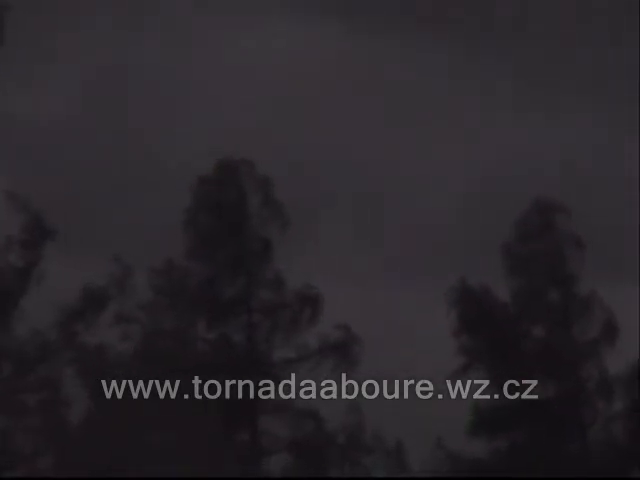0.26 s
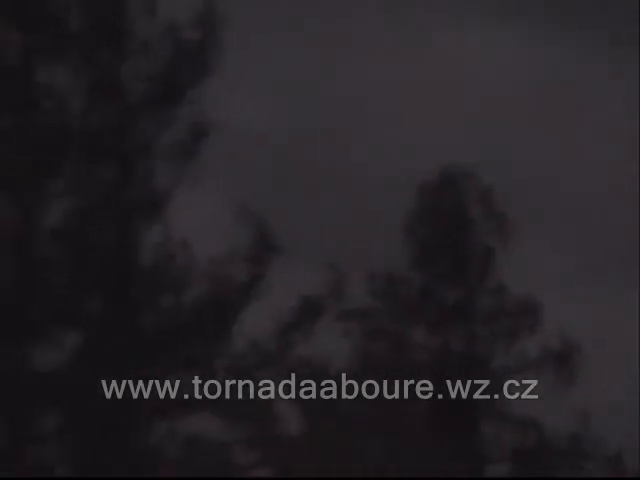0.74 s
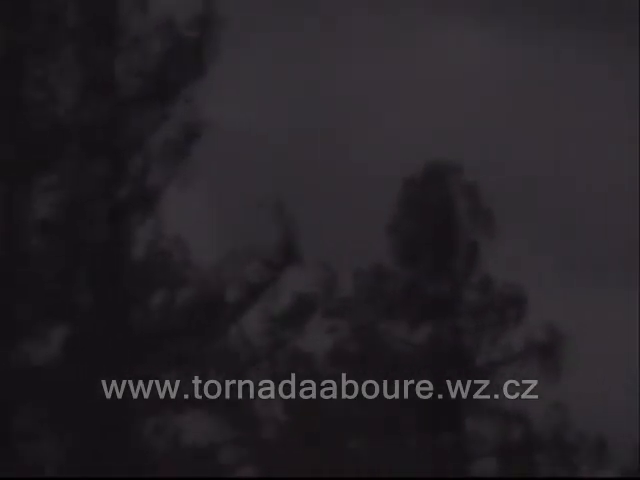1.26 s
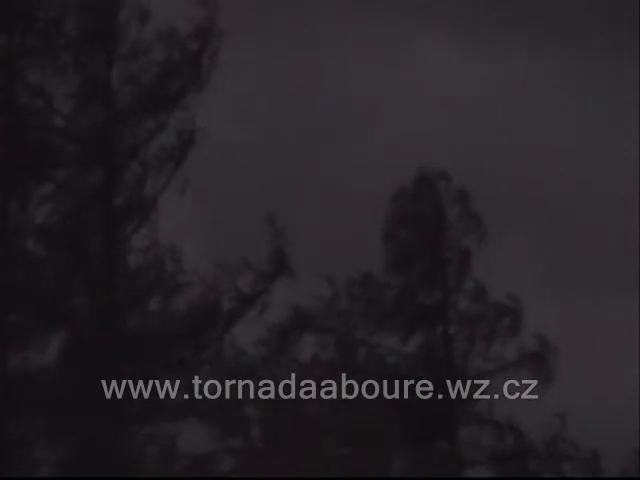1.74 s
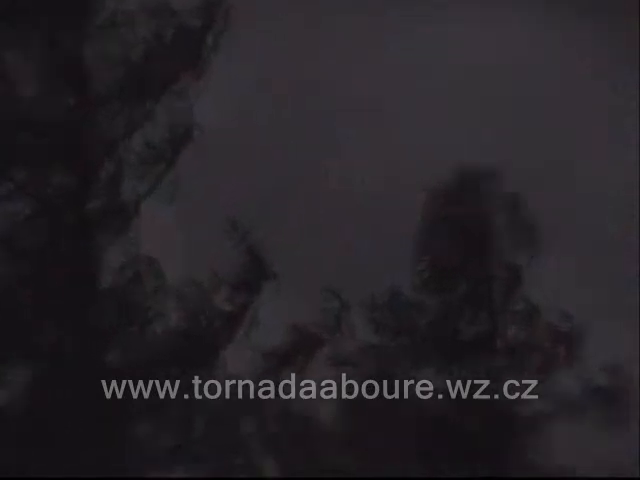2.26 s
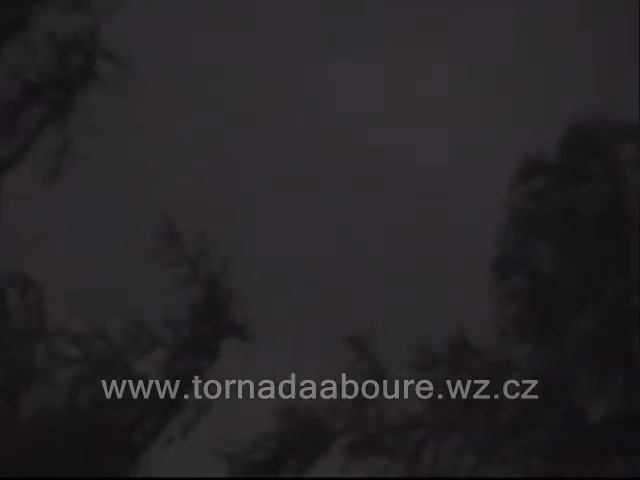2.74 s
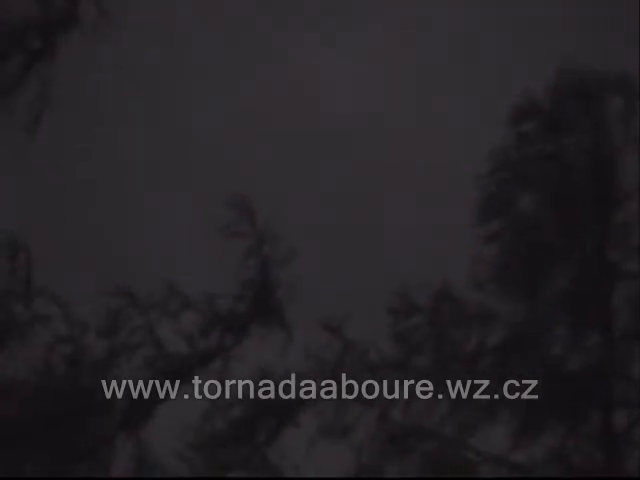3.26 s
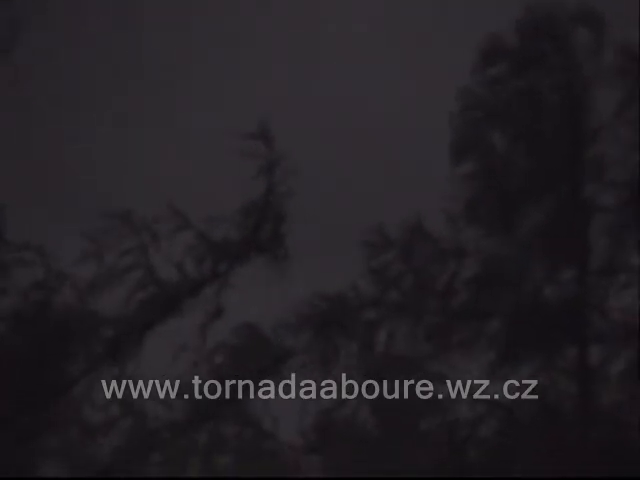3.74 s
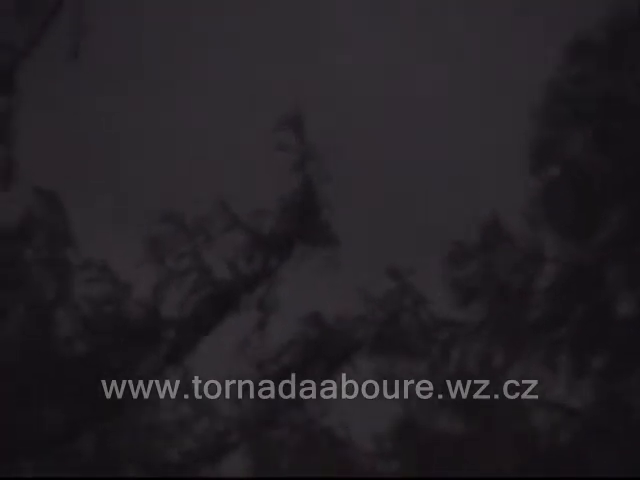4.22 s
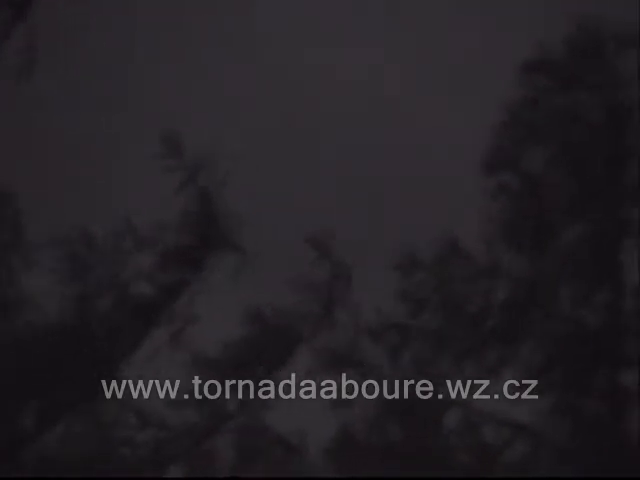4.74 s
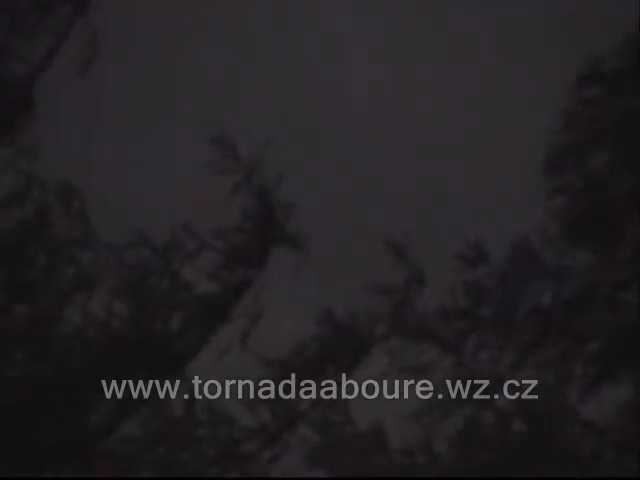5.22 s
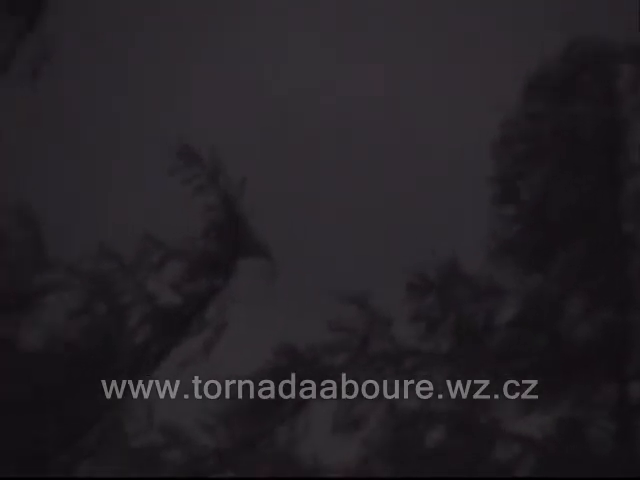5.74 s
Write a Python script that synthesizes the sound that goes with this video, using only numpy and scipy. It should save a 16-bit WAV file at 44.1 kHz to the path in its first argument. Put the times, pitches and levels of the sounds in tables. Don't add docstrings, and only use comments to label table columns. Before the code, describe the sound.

A storm wind blows through conifers close to a small handheld stereo recorder. A smooth, dense, mid-heavy hiss with a soft roar beneath runs throughout, varying only slightly, a little quieter around 3.5-4.5 s; the top end is dull and cut off. Low gusts buffet the bare microphone, pushing left and right in opposite directions. Small bumps come at 0.1 and 0.4 s, then a fluttering cluster of thumps from 0.8 to 1.2 s. Softer rumble follows to 1.9 s, and a hard, overloaded blow lands at 2.2 s. Lighter puffs at 2.5 and 2.9 s lead into a relative lull until about 3.8 s. Heavy buffeting returns from 3.9 to 4.5 s, eases to a low rumble, then grows strongest from 5.2 s to the end, with crowded deep thumps clipping near 5.4 and 5.8 s. A very faint, steady, thin high motor whine stays behind.

```python
import sys
import numpy as np
from scipy import signal
from scipy.fft import rfft, irfft, next_fast_len
from scipy.io import wavfile
from scipy.ndimage import uniform_filter1d

SR = 44100
rng = np.random.default_rng(int(sys.argv[2]) if len(sys.argv) > 2 else 0)


def master(y):
    cut = np.clip(np.atleast_2d(y).T, -1, 1)
    pcm = np.round(cut * 32767)
    wavfile.write(sys.argv[1], SR, pcm.astype(np.int16))


def level_to_linear(level):
    exponent = np.asarray(level, float) / 20
    return 10 ** exponent


N = 264159

# (time [s], level [dB])
WIND_HISS = [(0, -28.5), (.5, -29.5), (1.7, -28.5), (2.1, -29), (2.5, -28.5), (3.0, -30), (3.7, -31),
             (4.45, -31.4), (4.8, -29), (5.05, -30.4), (5.3, -29.5), (5.99, -29.2)]
# (frequency [Hz], density [dB per Hz])
NEEDLE_COLOUR = [(60, -15), (130, -8), (250, -7), (420, -4.5), (560, -2.5), (720, 0.3), (950, -2.5),
                 (1250, -6.5), (1700, -8), (2650, -9.5), (3300, -11.5), (4300, -15), (6000, -19.5),
                 (7400, -23.5)]
# (frequency [Hz], share of the difference tied to the sum [0-1],
# its phase [rad], difference over sum [dB])
PORT_PAIR = [(300, 0.55, -0.7, -13.0), (450, 0.63, -0.8, -13.4), (700, 0.39, -1.5, -14.5),
             (1000, 0.35, -2.0, -10.8), (1400, 0.16, -2.8, -7.7), (2000, 0.12, -2.7, -6.7),
             (2400, 0.26, -3.9, -8.0), (2800, 0.19, -4.1, -6.5), (3300, 0.34, -4.1, -7.4),
             (4000, 0.47, -4.9, -6.7), (5000, 0.43, -5.5, -6.9), (6500, 0.34, -6.1, -6.9),
             (7500, 0.25, -6.6, -7.4), (8100, 0.04, -3.6, -11.7)]
# (start [s], hold [s], opposed level [dB], common level [dB], centre [Hz])
PORT_GUSTS = [(0, .11, -38, -46.5, 90), (0.115, .03, -29, -35, 110), (.40, 0.077, -29, -40.5, 65),
              (.68, 0.073, -38.5, -57, 70), (0.81, 0.083, -20.5, -24, 120), (0.963, .25, -22.5, -32.5, 100),
              (1.247, .15, -34, -46, 60), (1.576, 0.04, -29, -39.5, 62), (1.674, 0.22, -26.5, -38, 82),
              (2.05, 0.069, -33, -40.5, 50), (2.138, 0.067, -22.5, -28.5, 80),
              (2.29, 0.25, -40.5, -52.5, 85), (2.546, .05, -25.5, -34, 88), (2.62, 0.065, -34.5, -43, 80),
              (2.887, 0.064, -26, -37, 65), (3.236, 0.069, -42.5, -45.5, 65), (3.574, 0.11, -40, -40.5, 58),
              (3.78, 0.13, -29, -39.5, 55), (3.941, .29, -20, -28.5, 96), (4.298, .28, -26.5, -35.5, 65),
              (4.722, 0.53, -30.5, -37.5, 52), (5.224, 0.23, -18, -27, 81.4),
              (5.55, .285, -17.5, -27.5, 69), (5.94, .04, -24, -34, 88)]
# (time [s], opposed peak [dB], swing [Hz], common peak [dB])
STRONG_EDDIES = [(.132, -17, 107, -26), (0.414, -11.5, 107, -18.5), (.831, -8.5, 105.5, -18.5),
                 (.856, -9, 115.5, -13.5), (.879, -10.5, 148, -8), (0.916, -10, 117, -31),
                 (.974, -14.5, 84.8, -22), (1.066, -11, 81, -17.5), (1.106, -13, 101, -16),
                 (1.143, -13.5, 89.5, -22), (1.202, -10.5, 108.4, -34), (2.153, -13.5, 70.1, -25.5),
                 (2.191, -9.5, 74.7, -22), (2.208, 0.5, 97.6, -15), (2.919, -13, 66, -25.5),
                 (4.031, -9.5, 68.4, -22), (4.128, -10, 62, -24.5), (4.261, -5.5, 82.6, -21),
                 (4.503, -6, 66.5, -26), (5.293, -9.5, 66, -23), (5.373, -2, 76.3, -21),
                 (5.443, -4.5, 72.5, -20.5), (5.571, -4, 72, -29), (5.691, -7.5, 55, -25),
                 (5.726, -9.5, 108.4, -16), (5.747, -6, 88, -14), (5.783, -0.5, 90, -14),
                 (5.816, 2.2, 82, -17.5), (5.831, -7, 120, -23.5), (5.892, -7.5, 95, -21)]
# (frequency [Hz], left level [dB], right level [dB])
MOTOR_TONES = [(2617.8, -55, -64), (2623.7, -51, -62), (2677, -59, -56), (2682.3, -58, -54),
               (2698.2, -52, -48)]
# (frequency [Hz], gain [dB])
PASS_BAND = [(8, -24), (30, 0), (7400, 0), (7600, -2), (7800, -6), (8000, -15), (8150, -25), (8400, -70)]

SPLIT_HZ = 1566
ROAR_DB, ROAR_FOLLOWS = -27.5, 0.45
RISE_DB_PER_S, FALL_DB_PER_S = 500.5, 261.5
LULL_DB, LULL_COMMON_DB, LULL_HZ = -48, -58, 62
FLOW_UNDER_DB = 3.5
EDDY_MS = 8.2
FLICK_HZ, FLICK_MS, FLICK_SCATTER_S = 255, 7.3, 0.0057
FLICK_LOSS_DB, FLICK_COMMON_LOSS_DB, FLICK_SPREAD_DB = 15, 14.5, 3.0
SHED_PER_S, SHED_JITTER, SHED_MS = 38, 0.3, 9.9
SHED_OVER_DB, SHED_COMMON_OVER_DB = 4.0, 0.5
SHED_SPREAD_DB, SHED_PITCH_SPREAD_DB = 2.5, 2.5


def in_time(rows):
    s, *columns = np.transpose(rows)
    return [np.interp(np.arange(N) / SR, s, column) for column in columns]


def at_hz(points, hz, column=1):
    points = np.array(points)
    return np.interp(np.log(hz + 1), np.log(points[:, 0]), points[:, column])


def rms_one(x):
    return x / np.sqrt(np.mean(x ** 2) + 1e-20)


def drift(rate_hz):
    pole = np.exp(-80 * np.pi * rate_hz / SR)
    noise = rng.standard_normal(N // 40 + 2002)
    slow = signal.lfilter([1], [1, -2 * pole, pole * pole], noise)[2000:]
    return np.interp(np.arange(N) / 40, np.arange(len(slow)), rms_one(slow))


def wind():
    hiss_db, = in_time(WIND_HISS)
    roar_db = ROAR_DB + ROAR_FOLLOWS * (hiss_db - hiss_db.mean())
    return roar_db, hiss_db


def crowns(sway_db, flutter_db):
    size = next_fast_len(N)
    hz = np.arange(size // 2 + 1) * SR / size
    colour = level_to_linear(at_hz(NEEDLE_COLOUR, hz)) * np.minimum(hz / NEEDLE_COLOUR[0][0], 1) ** 2
    common, own = rfft(rng.standard_normal((2, size))) * colour
    tied = np.clip(at_hz(PORT_PAIR, hz), 0, 0.99)
    turned = tied * np.exp(1j * at_hz(PORT_PAIR, hz, column=2)) * common
    difference = (turned + np.sqrt(1 - tied ** 2) * own) * level_to_linear(at_hz(PORT_PAIR, hz, column=3))
    pair = np.array([common, difference])
    low = 1 / (1 + (hz / SPLIT_HZ) ** 4)
    out = 0
    for share, level_db in zip((low, 1 - low), wind()):
        band = irfft(pair * share, size)[:, :N]
        moving_db = level_db + sway_db * drift(12.0) + flutter_db * drift(3.3)
        out = out + band / band[0].std() * level_to_linear(moving_db)
    return out


def gusts():
    start_s, hold_s, opposed_db, common_db, hz = np.transpose(PORT_GUSTS)[:, :, None]
    t = np.arange(0, N + 64, 64) / SR
    rise_db = -RISE_DB_PER_S * np.maximum(start_s - t, 0)
    fall_db = -FALL_DB_PER_S * np.maximum(t - start_s - hold_s, 0)
    shape_db = rise_db + fall_db
    power, lull = level_to_linear(opposed_db + shape_db) ** 2, level_to_linear(LULL_DB) ** 2
    opposed = lull + power.sum(axis=0)
    common = level_to_linear(LULL_COMMON_DB) ** 2 + np.sum(level_to_linear(common_db + shape_db) ** 2, axis=0)
    centre_hz = (lull * LULL_HZ + np.sum(power * hz, axis=0)) / opposed
    return in_time(np.transpose([t, 10 * np.log10(opposed), centre_hz, 10 * np.log10(common)]))


def turbulence(lumpy_db, below_db, above_db, even):
    level_db, centre_hz, common_db = gusts()
    out = 0
    edges_hz = 16 * 2 ** np.arange(0, 6, 0.5)
    for low_hz, high_hz in zip(edges_hz, edges_hz[1:]):
        sos = signal.butter(2, [low_hz, high_hz], "band", fs=SR, output="sos")
        band = signal.sosfilt(sos, rng.standard_normal((2, N + SR // 2)))[:, SR // 2:]
        octaves = np.log2(np.sqrt(low_hz * high_hz) / centre_hz)
        distance = np.logaddexp(0, 2.65 * np.abs(octaves) - 1.5) / 3
        slope_db = np.where(octaves > 0, above_db, below_db) * distance
        out = out + rms_one(band) * level_to_linear(lumpy_db * drift(22) - slope_db)
    strength = uniform_filter1d(uniform_filter1d(out ** 2, size=1800), size=1800)
    slow = uniform_filter1d(strength, size=12000)
    out = out / np.sqrt(strength ** even * slow ** (1 - even))
    return out * level_to_linear([common_db, level_db])


def eddies(rows, stretch, edge, swings, balance, scatter):
    out = np.zeros((2, N))
    phases = np.array(scatter) * rng.uniform(-np.pi, np.pi, (len(rows), 2))
    for (s, opposed_db, hz, ms, common_db), phase in zip(rows, phases):
        first, last = max(round((s - 0.06) * SR), 0), min(round((s + 0.06) * SR), N)
        at = np.arange(first, last)
        t = at / SR - s
        longest_s = 0.0068 * level_to_linear(-opposed_db / 2)
        width_s = max(min(stretch * ms / 1000, longest_s), swings / hz)
        bell = np.exp(-0.5 * (t / width_s) ** 2)
        turn = 2 * np.pi * hz * t + phase[:, None]
        swing = -np.sin(turn + edge * np.sin(turn))
        net = np.sum(bell * swing, axis=1, keepdims=True) / bell.sum()
        out[:, at] += bell * (swing - np.array(balance) * net) * level_to_linear([[common_db], [opposed_db]])
    return out


def strong_eddies():
    rows = [(s, db, hz, EDDY_MS, common_db) for s, db, hz, common_db in STRONG_EDDIES]
    return eddies(rows, stretch=0.32, edge=0.51, swings=0.4, balance=[[0.95], [0.4]], scatter=[1, 0.15])


def flicks():
    rows = []
    chance = rng.standard_normal((len(STRONG_EDDIES), 3))
    for (s, db, _, common_db), (late, more, high) in zip(STRONG_EDDIES, chance):
        opposed_db = db - FLICK_LOSS_DB + FLICK_SPREAD_DB * more
        rows.append((s + FLICK_SCATTER_S * late, opposed_db, FLICK_HZ * level_to_linear(0.7 * high),
                     FLICK_MS, common_db - FLICK_COMMON_LOSS_DB))
    return eddies(rows, stretch=0.25, edge=0.22, swings=0.25, balance=[[0.9], [0.9]], scatter=0.95)


def lesser_eddies():
    late, more, high, alike = rng.standard_normal((400, 4)).T
    s = np.cumsum(np.maximum(1 + SHED_JITTER * late, 0.3)) / SHED_PER_S
    at = np.minimum(s * SR, N - 1).astype(int)
    level_db, centre_hz, common_db = np.array(gusts())[:, at]
    opposed_db = level_db + SHED_OVER_DB + SHED_SPREAD_DB * more
    hz = centre_hz * level_to_linear(SHED_PITCH_SPREAD_DB * high)
    shared_db = common_db + SHED_COMMON_OVER_DB + SHED_SPREAD_DB * alike
    rows = np.transpose([s, opposed_db, hz, np.full(len(s), SHED_MS), shared_db])[s < N / SR]
    return eddies(rows, stretch=0.45, edge=0.45, swings=0.45, balance=[[0.95], [0.6]], scatter=1)


def motor_whine():
    hz, *level_db = np.transpose(MOTOR_TONES)
    phases = rng.uniform(0, 2 * np.pi, (2, len(hz), 1))
    tones = np.sin(2 * np.pi * hz[:, None] * np.arange(N) / SR + phases)
    return np.sqrt(2) * np.sum(level_to_linear(level_db)[:, :, None] * tones, axis=1)


def scene():
    needles = crowns(sway_db=0.33, flutter_db=0.13)
    flow = turbulence(lumpy_db=3.5, below_db=[[7.5], [2.5]], above_db=[[5.8], [10.5]], even=1.0)
    buffeting = flow * level_to_linear(-FLOW_UNDER_DB) + strong_eddies() + flicks() + lesser_eddies()
    common, opposed = needles + buffeting
    return np.array([common + opposed, common - opposed]) + motor_whine()


def roll_off(x):
    return signal.sosfilt(signal.butter(12, 8360, fs=SR, output="sos"), x)


def record(dry):
    size = next_fast_len(N)
    hz = np.arange(size // 2 + 1) * SR / size
    cut = irfft(rfft(dry, size) * level_to_linear(at_hz(PASS_BAND, hz)), size)[:, :N]
    return roll_off(np.clip(cut, -1, 1))


dry = scene()
out = record(dry)
master(out)
```